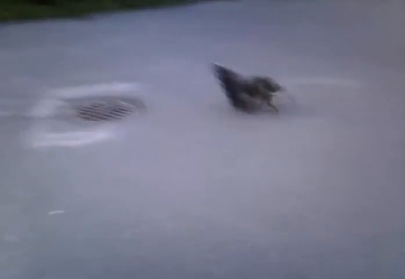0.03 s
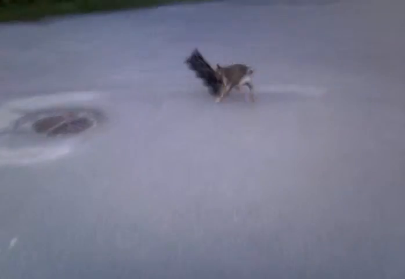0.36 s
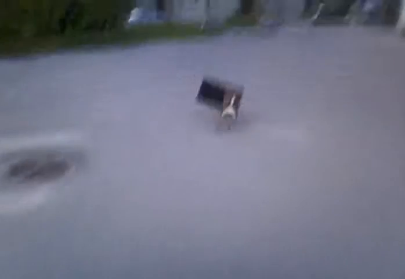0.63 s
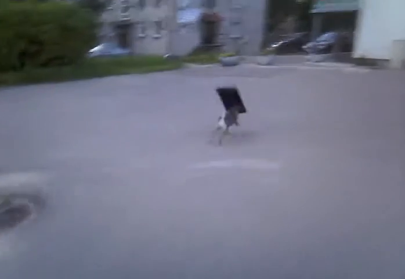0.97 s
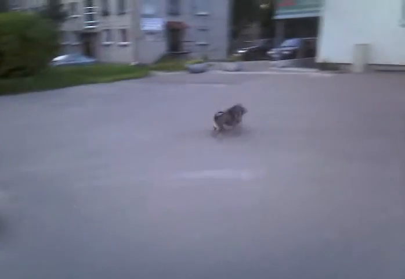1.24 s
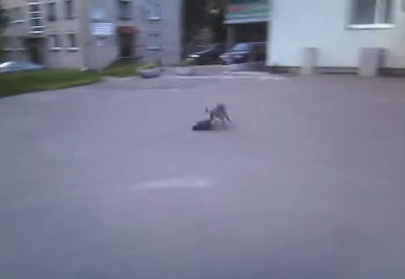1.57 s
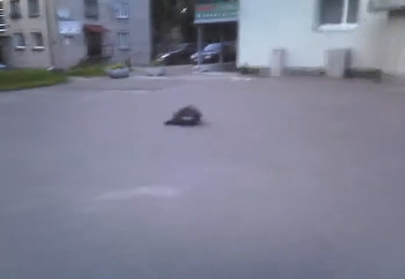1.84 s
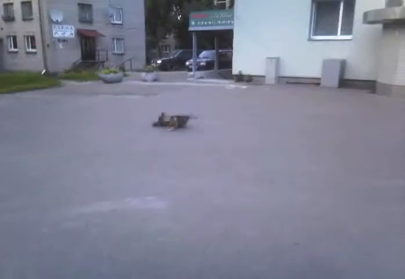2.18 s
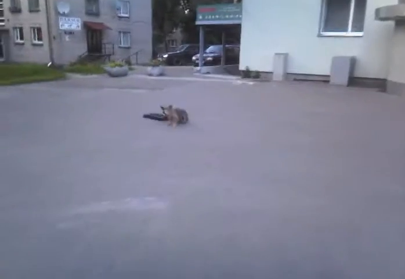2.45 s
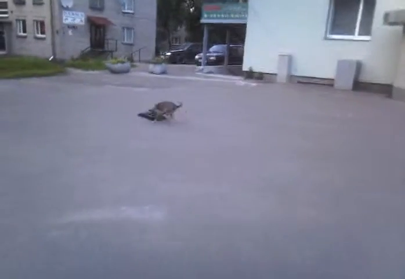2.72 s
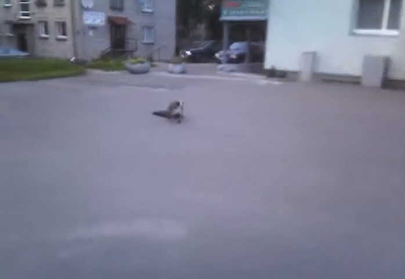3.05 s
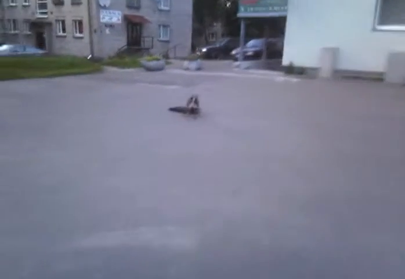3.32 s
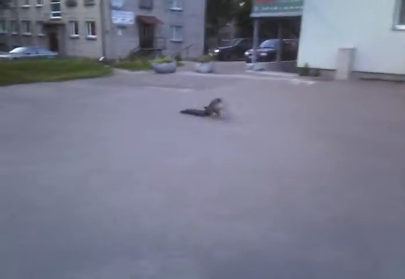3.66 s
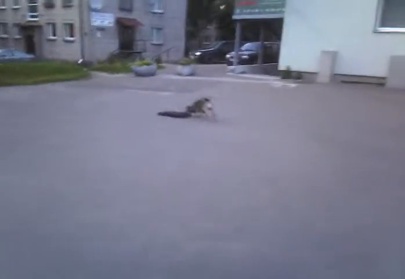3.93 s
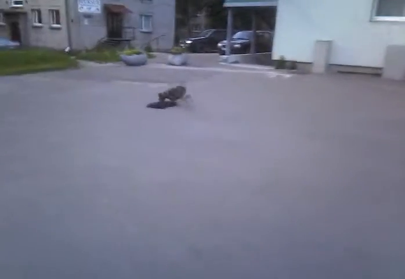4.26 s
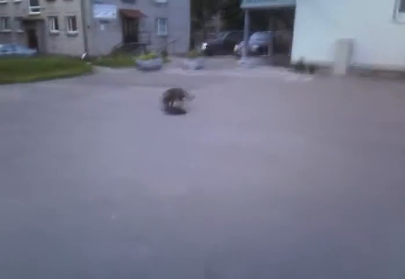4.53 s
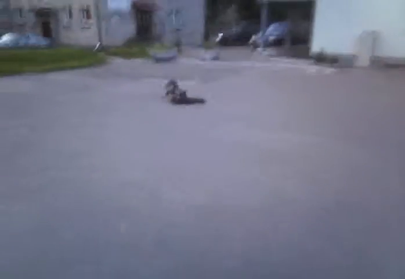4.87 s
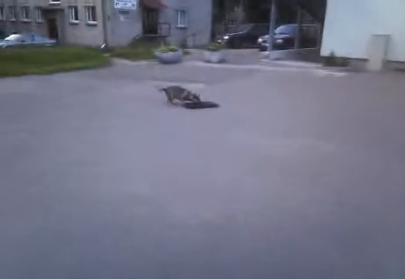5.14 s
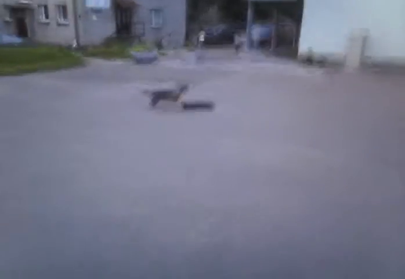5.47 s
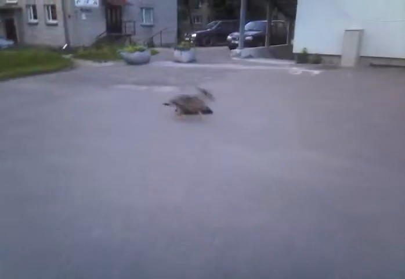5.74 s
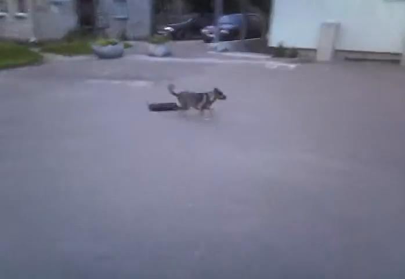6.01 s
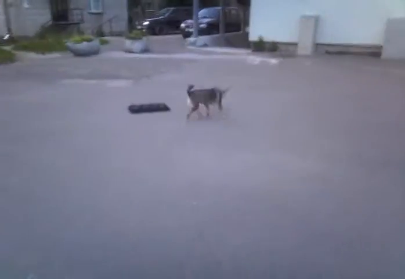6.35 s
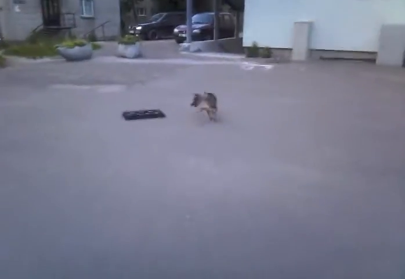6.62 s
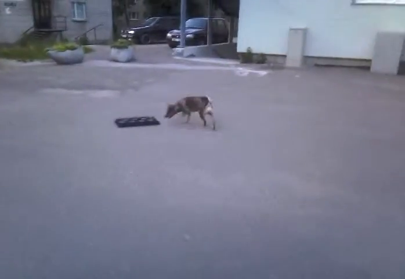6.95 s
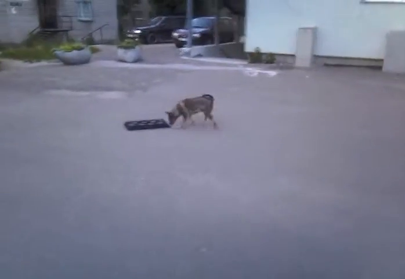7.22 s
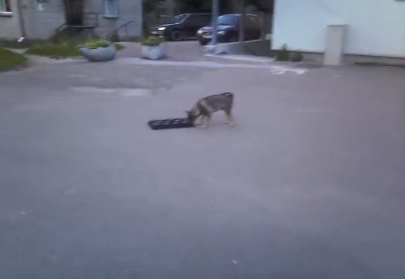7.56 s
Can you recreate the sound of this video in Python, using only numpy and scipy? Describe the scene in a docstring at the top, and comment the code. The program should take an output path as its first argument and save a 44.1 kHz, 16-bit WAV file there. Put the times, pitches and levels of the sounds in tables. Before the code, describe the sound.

A dog runs with a clacking plastic tray, then drags it in loud rasping tugs across asphalt, with faint traffic behind.

```python
"""A plastic tray clacks and crackles in the jaws of a dog running across an asphalt courtyard.
The dog drops it, drags it in rasping tugs and lets go. Grit and knocks ring the same few damped
modes of the tray, and the house fronts answer. Further off, a car pulls away over a wash of traffic.
A narrow-band phone microphone overloads on the loudest scrapes."""
import sys
import numpy as np
from scipy import signal
from scipy.fft import rfft, irfft, next_fast_len
from scipy.io import wavfile
from scipy.ndimage import uniform_filter1d

SR = 44100
rng = np.random.default_rng(int(sys.argv[2]) if len(sys.argv) > 2 else 0)


def transcribe(u):
    """Save the signal u as a 16-bit wav file named by the first command-line argument.

    u: samples, shape (n,) or (channels, n), limited to [-1, 1]; the rate is SR.
    q: integer samples, one column per channel.
    """
    v = np.clip(np.atleast_2d(u).T, -1, 1)
    q = np.round(v * 32767).astype(np.int16)
    wavfile.write(sys.argv[1], SR, q)


N = 339063
TIME = np.arange(N) / SR
LANDING_S = 1.5  # the tray hits the ground


def undb(db):
    """Decibels to gain."""
    return 10 ** (np.asarray(db) / 20)


def unit(x):
    """Scale to rms 1."""
    return x / np.sqrt(np.mean(x ** 2) + 1e-18)


def steady(x, window_s):
    """Hold the slow level at 1 and keep the fast grain."""
    return x / np.sqrt(uniform_filter1d(x ** 2, int(window_s * SR)).clip(1e-9))


def drift(rate_hz):
    """Smooth random wander with rms 1."""
    hold = int(SR / rate_hz)
    steps = np.repeat(rng.standard_normal(N // hold + 1), hold)
    return unit(uniform_filter1d(steps, hold)[:N])


def resonate(x, hz, width_hz):
    """A damped resonance with steep skirts."""
    b, a = signal.iirpeak(hz, max(hz / width_hz, .6), fs=SR)
    return signal.lfilter(b, a, signal.lfilter(b, a, x + 1e-18))


def grit(size, per_s, spread_db):
    """Tiny impacts at random moments; with a spread, many are weak and a few stronger."""
    hits = rng.random(size) < per_s / SR
    return hits * undb(spread_db * np.minimum(rng.exponential(size=size), 3))


def distance(start_m=1.13, run_m_per_s=6.2):
    """Metres from the microphone to the tray: the dog runs off until it lands."""
    return start_m + run_m_per_s * np.minimum(TIME, LANDING_S)


def tray(force, airborne, hollow_db, rim_db, hollow_below_hz=800, rim_above_hz=2200):
    """Every impact lands on another spot, so it shares itself out differently among the tray's modes."""
    # damped modes (frequency [Hz], width [Hz], level on the ground [dB], level in the air [dB])
    modes = [(288, 150, -13, -8), (473.7, 122, -3, -12), (555.5, 126, 0, -7.5), (689.6, 293, -1, -2),
             (1071, 280, 0, -6.5), (1350, 470, -3, -1.5), (1561, 182, -3, -6.5), (1755, 210, 0, -3.5),
             (2072, 386, -2, -1), (2324, 240, -7.5, -4.5), (2735, 460, -10.5, -9), (3494, 590, -13.5, -6.5)]
    out, power = 0, 0
    for hz, width_hz, ground_db, air_db in modes:
        gain = undb(air_db if airborne else ground_db)
        # low modes belong to the hollow, high ones to the thin rim
        tone = undb(hollow_db * (hz < hollow_below_hz) + rim_db * (hz > rim_above_hz))
        ring = unit(resonate(force * rng.standard_normal(len(force)), hz, width_hz))
        out = out + gain * tone * ring
        power += gain ** 2
    return out / np.sqrt(power)


def carry(gap_s=0.069, at_1m_db=-21):
    """Held in the air, the thin plastic crackles, fainter as the dog runs off; the crackle stops just before
    the tray lands."""
    force = grit(N, per_s=1300, spread_db=1.5)
    crackle = steady(tray(force, airborne=True, hollow_db=1.0, rim_db=-2.5), window_s=0.016)
    return crackle * undb(at_1m_db) / distance() * (TIME < LANDING_S - gap_s)


def knocks(chatter_decay_s=.012, ring_db=1, ring_width_hz=140, hollow_boost_db=7):
    """Each clack is a burst of fading contacts; the struck wall rings at a pitch set by its bend."""
    # knocks on the tray (time [s], level [dB], ring of the wall [Hz], hollowness [dB])
    strikes = [(0.025, -3.5, 1563, -10.5), (0.136, -12, 1530, 0), (0.291, -14.5, 1550, 0.5),
               (0.321, -10, 1535, -20), (0.398, -13.5, 1350, -22), (0.421, -16, 1470, -7.5),
               (0.637, -9.5, 1950, -3), (0.785, -13, 1780, 0.5), (0.89, -16, 1205, -6),
               (1.086, -16.5, 1230, -17.5), (1.100, -16.5, 1270, -3), (1.509, -2.5, 1113, -12.5),
               (1.796, -7, 1670, 2.5), (1.871, -5, 1530, -19), (1.911, -3, 1520, -7),
               (1.959, -4.5, 2033, -9.5), (2.105, -2, 1920, -13), (2.256, -5.5, 1710, -16.5),
               (2.58, -6.5, 1726, -6.5), (2.951, -7.5, 2010, -7), (3.037, -6, 1238, -4.5),
               (3.367, -17.5, 1530, -6.5), (3.529, -7, 1697, -14.5), (3.626, -8.5, 1610, -2),
               (3.794, -8.5, 1083, -15), (4.158, -4, 2100, -16), (4.214, -3.5, 1067, -16.5),
               (4.32, -5, 1880, -3.5), (4.562, -3.5, 1715, -6), (4.714, -10, 1160, -7),
               (4.851, -9, 1780, -18), (5.224, -7.5, 1745, -21), (5.379, -6.5, 1600, -11.5),
               (5.595, -10, 1740, -5), (5.808, -18, 2097, -3), (7.679, -23.5, 2130, -18)]
    out, size = np.zeros(N + SR), SR // 6
    age = np.arange(size) / SR
    for time_s, db, ring_hz, hollow_db in strikes:
        force = grit(size, per_s=3500, spread_db=2.0) * np.exp(-age / chatter_decay_s)
        body = tray(force, airborne=time_s < LANDING_S, hollow_db=hollow_db + hollow_boost_db, rim_db=0)
        b, a = signal.iirpeak(ring_hz, ring_hz / ring_width_hz, fs=SR)
        wall = unit(signal.lfilter(b, a, body))
        clack = body + undb(ring_db) * wall
        peak = 2 * np.sqrt(uniform_filter1d(clack ** 2, size=256).max())
        start = max(int((time_s - .001) * SR), 0)
        out[start:start + size] += clack * undb(db) / peak
    return out[:N]


def car(waver=.005, flutter_db=2.8, coasting_hz=61, loaded_hz=72):
    """A distant engine revs up, then eases off; its upper orders sink with the load."""
    # the engine pulling away (time [s], firing rate [Hz], level [dB])
    revs = [(0, 73, -43), (.45, 74.8, -45), (.65, 75.9, -39.5), (1.12, 80.7, -39), (1.25, 76.3, -39.5),
            (1.45, 66, -46), (2.3, 60.9, -44.5), (2.9, 59, -46.5), (5.6, 55.8, -53), (7.69, 58.43, -51)]
    # exhaust tone, a row per multiple of the firing rate (under load [dB], off the throttle [dB])
    exhaust = [(-14.5, -9), (-18.5, -8), (-3, -14), (-4.5, -5.5), (-6.5, -12.5), (-6, -18)]
    times, rates, levels = np.transpose(revs)
    firing_hz = np.interp(TIME, times, rates)
    phase = 2 * np.pi * np.cumsum(firing_hz * (1 + waver * drift(rate_hz=16))) / SR
    load = np.clip((firing_hz - coasting_hz) / (loaded_hz - coasting_hz), 0, 1)
    out = 0
    for order, (loaded_db, coasting_db) in enumerate(exhaust, 1):
        order_db = load * loaded_db + (1 - load) * coasting_db + flutter_db * drift(rate_hz=12)
        out = out + np.sin(order * phase) * undb(order_db)
    return np.sqrt(2) * out * undb(np.interp(TIME, times, levels))


def town(level_db=-38, flicker_db=0.14):
    """Far traffic: an even wash that wavers a little."""
    # colour of the wash (frequency [Hz], relative level [dB])
    spectrum = [(18, -45), (30, -20), (212, -6), (314, -3.5), (347, -6.5), (383, -3.5), (431, -9),
                (580, -5.5), (627, -7.5), (1750, -7.5), (3360, -29), (4370, -52), (7390, -120)]
    hz, db = np.transpose(spectrum)
    size = next_fast_len(N)
    bins_hz = np.fft.rfftfreq(size, 1 / SR)
    colour = undb(np.interp(np.log(bins_hz + 1), np.log(hz), db))
    wash = irfft(rfft(rng.standard_normal(N), size) * colour, size)[:N]
    return unit(wash) * undb(level_db + flicker_db * drift(rate_hz=33))


def courtyard(x, wet_db, t60_s=0.53, first_echo_s=.02):
    """Scattered echoes from house fronts and parked cars."""
    delay = np.arange(SR) / SR
    scatter = grit(SR, per_s=900, spread_db=0.5) * rng.standard_normal(SR)
    echoes = scatter * undb(-60 * delay / t60_s) * (delay > first_echo_s)
    return undb(wet_db) * signal.fftconvolve(x, echoes / np.linalg.norm(echoes))[:N]


def effort(grip_s=0.037, skid_db_per_s=126):
    """Envelope of the drag: each pull grips, swells or slackens, then the tray skids to rest."""
    # pulls and skids over the ground (start [s], length [s], opening level [dB], swell to the end [dB])
    tugs = [(1.512, 0.025, -14.5, -1), (1.814, 0.23, -17, 5.5), (2.147, .3, -8, -4.5),
            (2.526, 0.078, -14, 1.5), (2.64, 0.35, -22.5, -9), (3.014, .18, -17.5, 2.5),
            (3.308, 0.33, -25, 11.5), (3.728, 0.074, -19.5, 7), (3.92, 0.2, -22.5, 0.5),
            (4.165, 0.068, -16, 3), (4.315, 0.15, -11.5, -5.5), (4.501, 0.081, -15.5, 3.5),
            (4.759, 0.12, -14.5, -3), (4.938, 0.24, -21, 0), (5.29, 0.09, -19.5, 0),
            (5.388, 0.061, -11, -3), (5.532, 0.13, -20.5, -3), (5.754, 0.043, -31, 0.5)]
    power = 1e-12
    for start, length, db, swell_db in tugs:
        age = TIME - start
        grip = np.clip(1 + age / grip_s, 0, 1)
        held_db = db + swell_db * np.clip(age / length, 0, 1)
        fade_db = skid_db_per_s * np.maximum(age - length, 0)
        power = power + (grip * undb(held_db - fade_db)) ** 2
    return np.sqrt(power) * (TIME > LANDING_S)


def drag(hops_per_s=85, hop_decay_s=0.0042, hop_depth=.42, firm_db=-19.5, rim_fade_db_per_s=1.0,
         level_db=-1.5):
    """The rim grinds over the stones, and catches and hops unevenly as it goes."""
    pull = effort()
    slack_db = firm_db - 20 * np.log10(pull + 1e-3)
    hollow_db = -0.94 + 0.01 * slack_db  # soft pulls sound a touch more hollow
    rim_db = 2.5 - rim_fade_db_per_s * (TIME - LANDING_S)  # the rim rasps most on landing
    hops = grit(N, hops_per_s, spread_db=0.0)
    rattle = signal.lfilter([1], [1, -np.exp(-1 / (hop_decay_s * SR))], hops)
    force = grit(N, per_s=2400, spread_db=1) * (1 + hop_depth * unit(rattle))
    scrape = steady(tray(force, airborne=False, hollow_db=hollow_db, rim_db=rim_db), window_s=.035)
    lurch_db = .7 * drift(rate_hz=24)  # the dog never pulls evenly
    return scrape * pull * undb(level_db + lurch_db)


def scene(echo_db_per_m=0.5):
    """The tray and the car with their echoes, over the town."""
    plastic = drag() + carry() + knocks()
    engine = car()
    # as the engine glides, its echoes make each order swell and fade in turn
    engine = engine + courtyard(engine, wet_db=-6.5)
    # the further the dog runs, the larger the share of echo
    send_db = echo_db_per_m * (distance() - distance().max())
    plastic_echo = courtyard(plastic * undb(send_db), wet_db=-9.5)
    return (plastic + plastic_echo + engine + town())[None]


def record(dry, band_hz=3620, ceiling=0.76, top_hz=15800):
    """The phone rounds the peaks, keeps only the telephone band and clips the very loudest."""
    rounded = np.tanh(.5 * dry) / .5
    narrow = signal.sosfilt(signal.ellip(12, .3, 70, band_hz, fs=SR, output="sos"), rounded)
    clipped = np.clip(narrow, -ceiling, ceiling)
    return signal.sosfilt(signal.ellip(8, .2, 70, top_hz, fs=SR, output="sos"), clipped)


dry = scene()
out = record(dry)
transcribe(out)
```